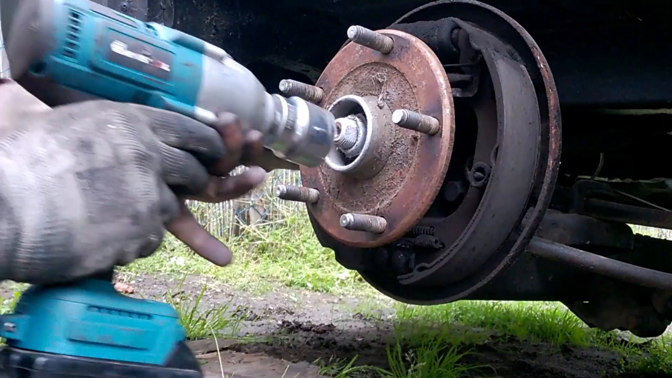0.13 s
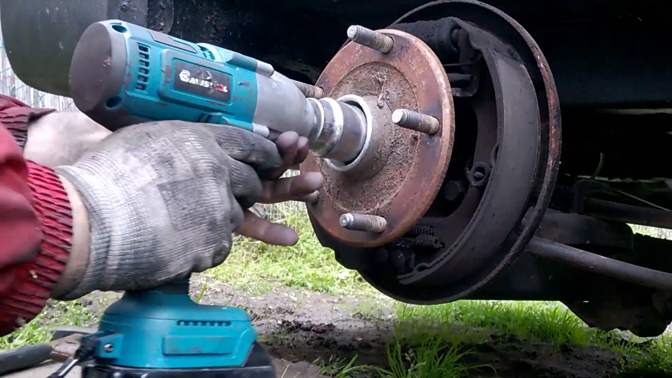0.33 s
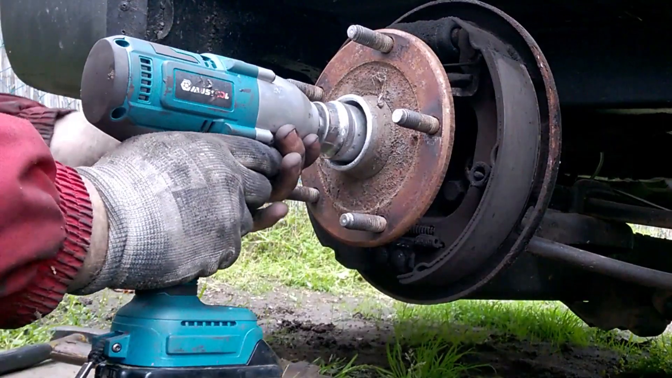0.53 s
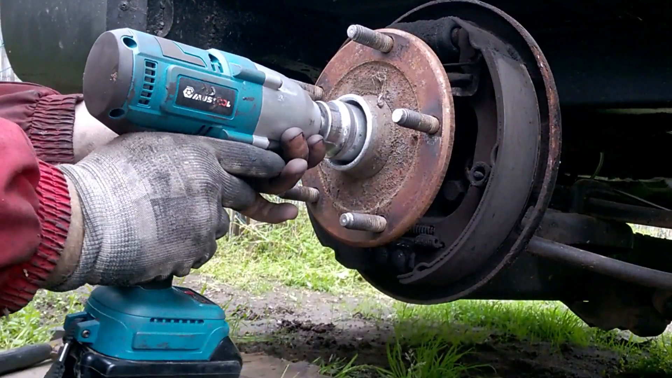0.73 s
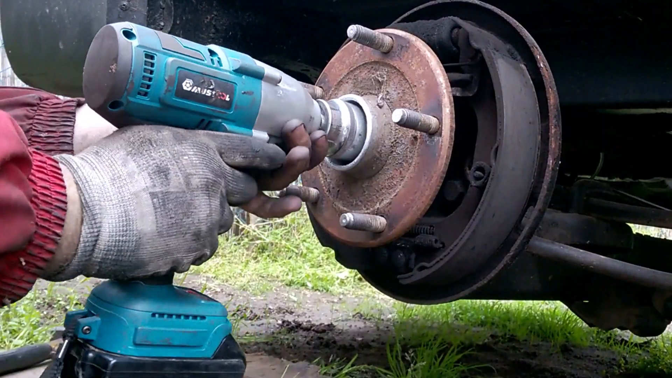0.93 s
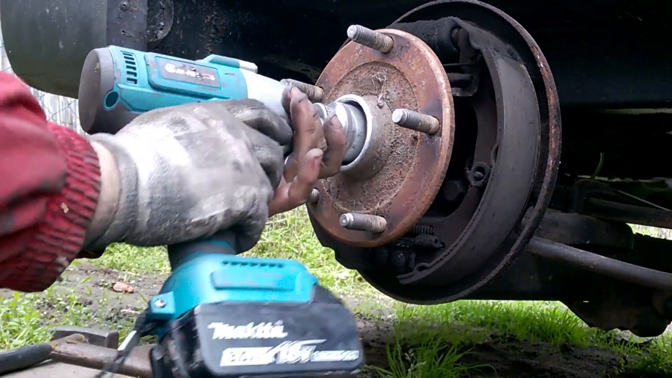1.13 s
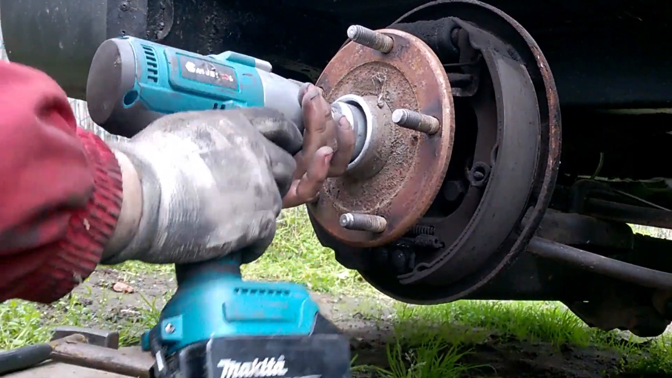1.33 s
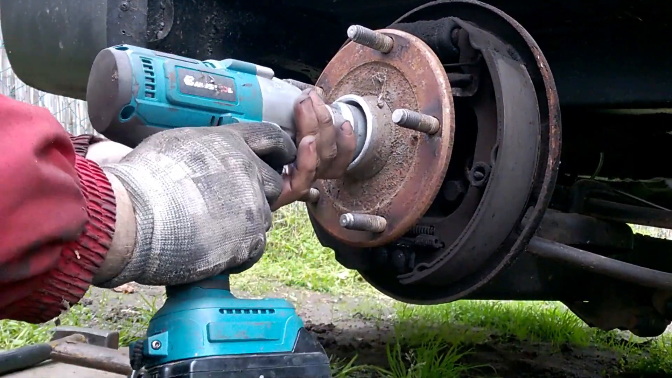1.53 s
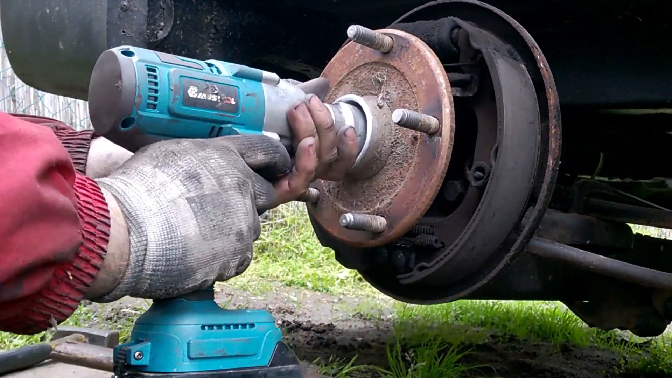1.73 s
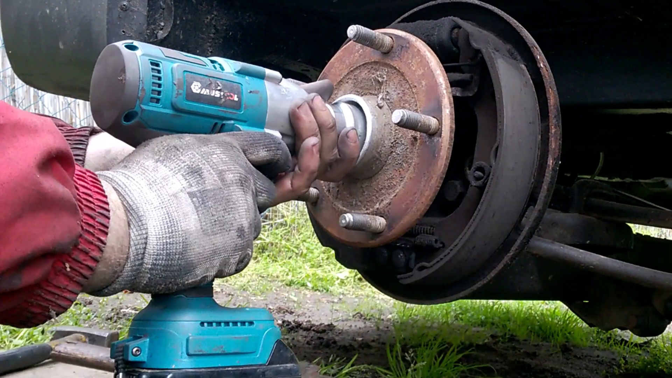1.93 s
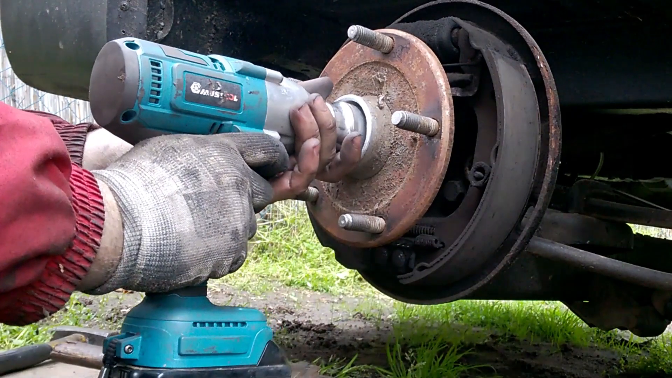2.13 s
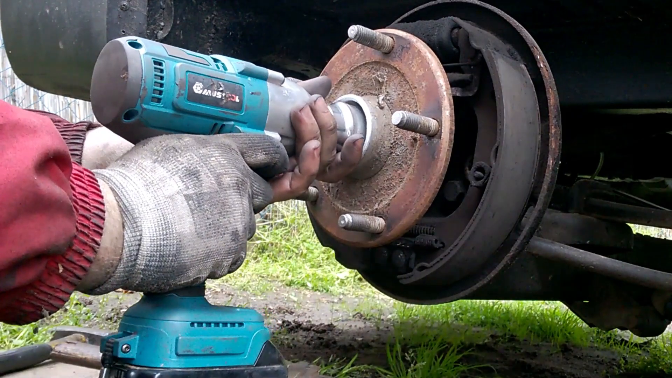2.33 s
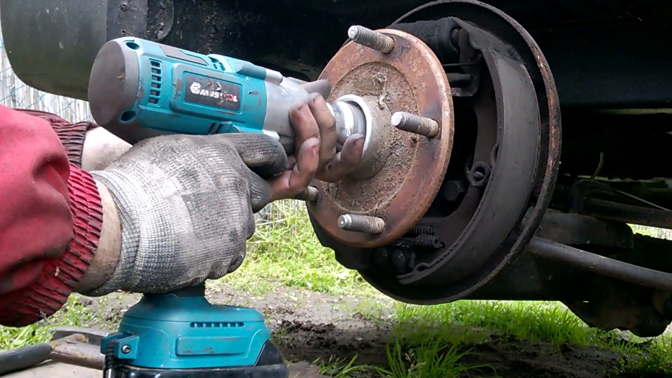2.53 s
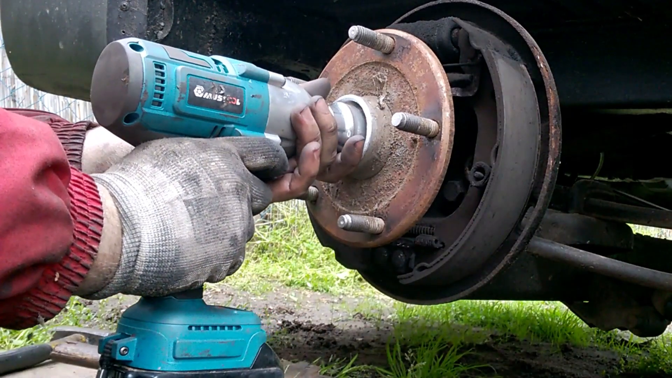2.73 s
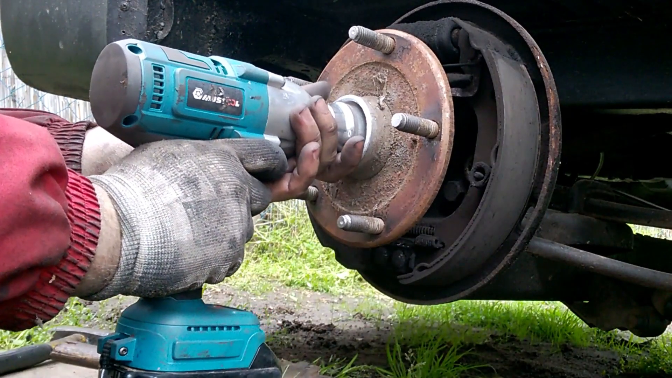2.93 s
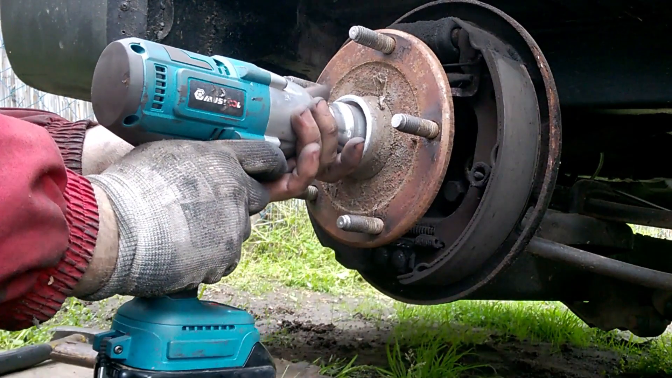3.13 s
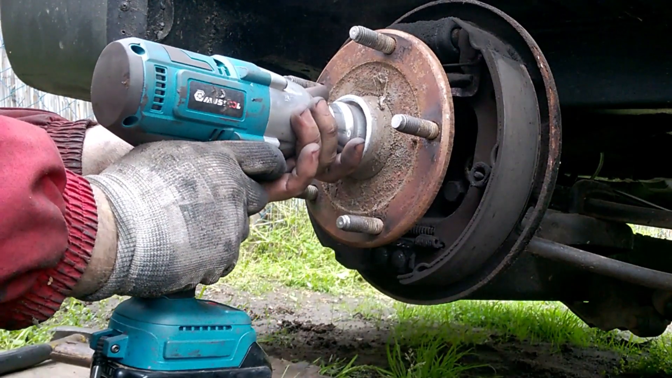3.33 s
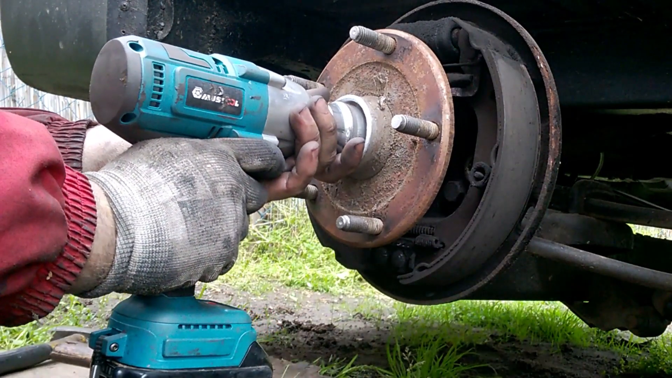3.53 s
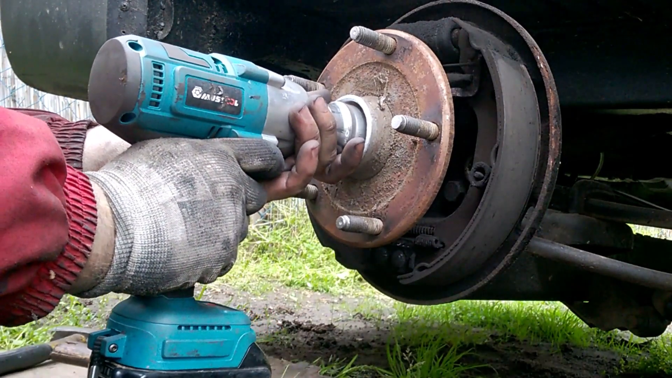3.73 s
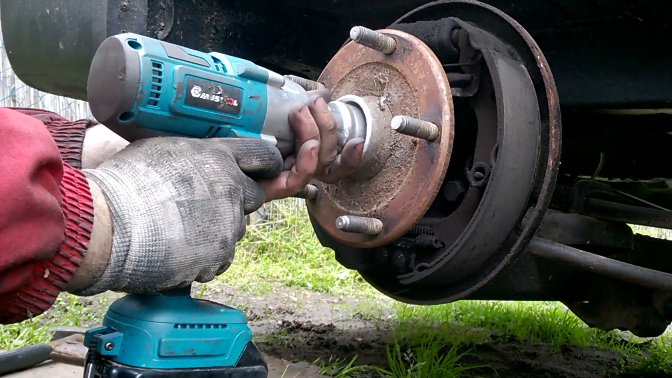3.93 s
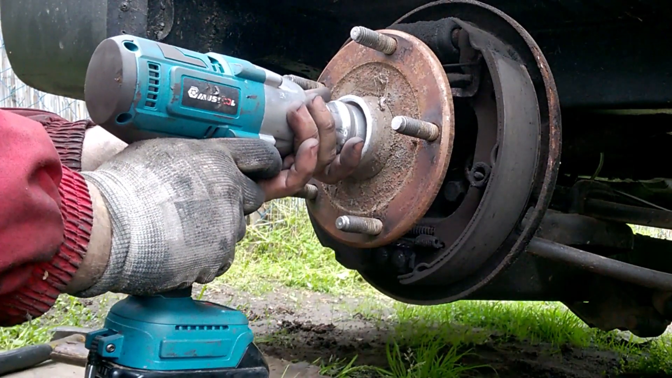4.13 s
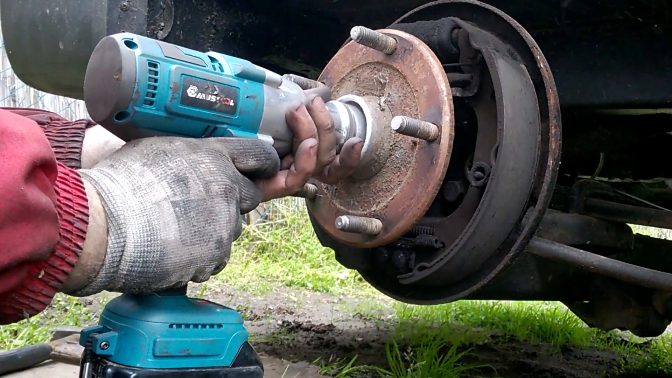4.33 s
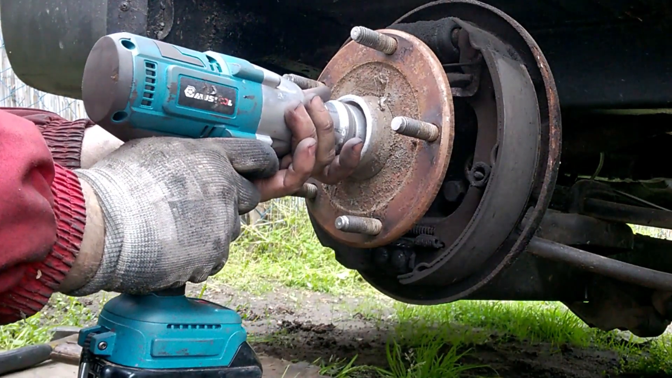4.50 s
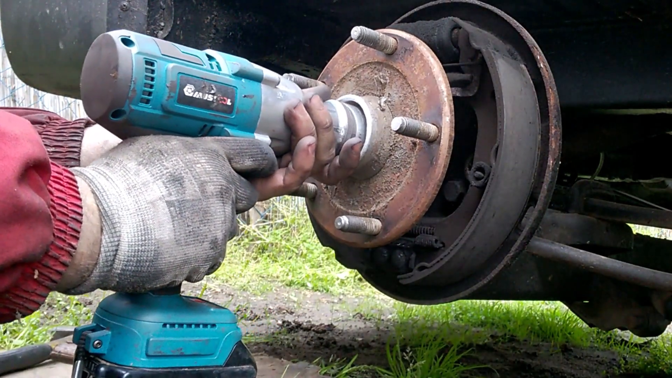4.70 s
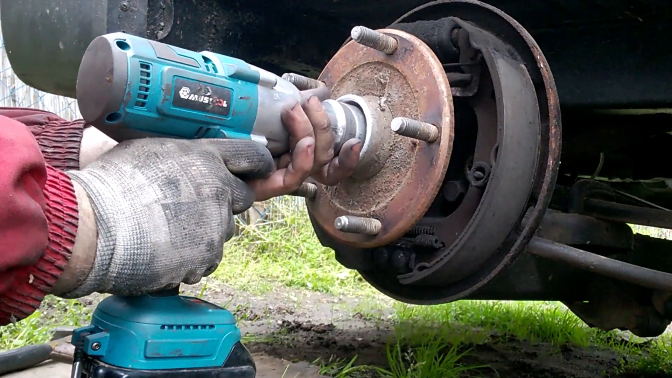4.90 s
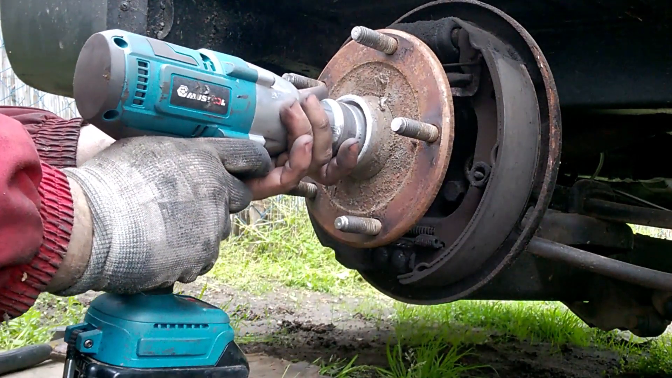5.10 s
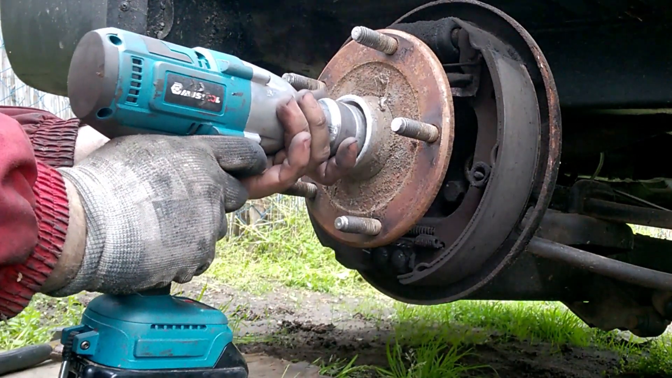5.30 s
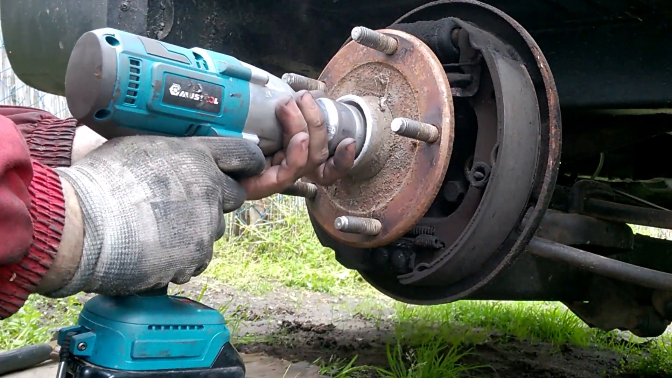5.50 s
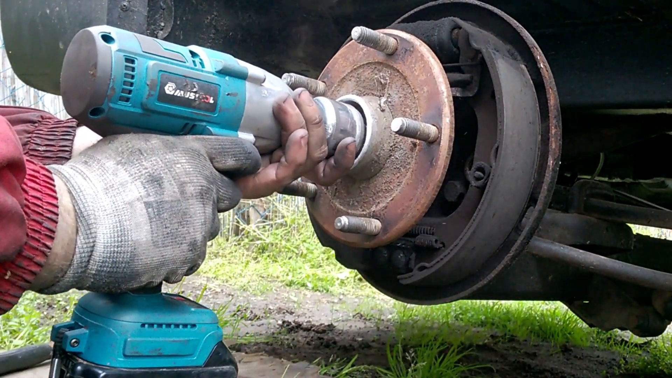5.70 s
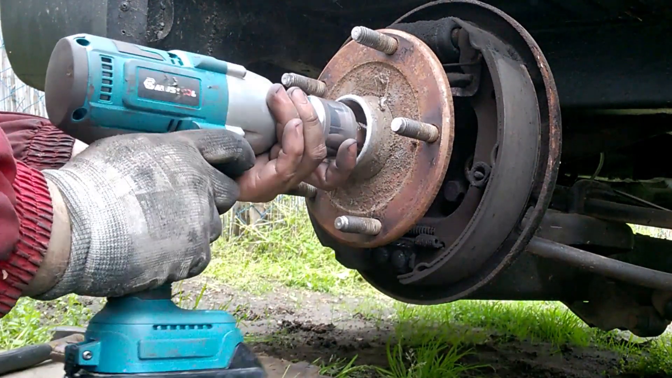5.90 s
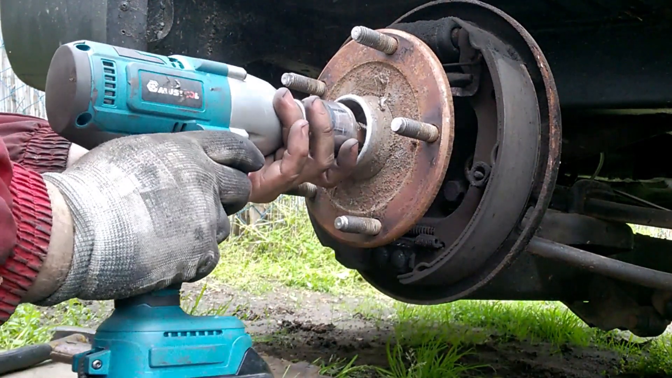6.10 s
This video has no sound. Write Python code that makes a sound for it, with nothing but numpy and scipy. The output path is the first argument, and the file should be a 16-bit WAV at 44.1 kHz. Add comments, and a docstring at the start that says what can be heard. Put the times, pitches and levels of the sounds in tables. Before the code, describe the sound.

Some metal knocks, then about four seconds of fast, steady impact wrench hammering on a nut, ending in a short motor whine.

```python
"""A cordless impact wrench hammers on the hub nut of a car axle, outdoors: about 45 blows a second,
slower and less evenly towards the end, each a volley of decaying noise bands and short sine clacks.
Before and after come knocks of the steel socket and fainter clicks: noise bands, resonances, ringing modes.
Gears rattle as filtered noise while the motor runs, and whine as a gliding harmonic tone once they run free.
A low rumble that swells after jolts and a faint hiss, both coloured noise, lie underneath."""
import sys
import numpy as np
from scipy import signal
from scipy.fft import rfft, irfft, next_fast_len
from scipy.io import wavfile
from scipy.ndimage import uniform_filter1d

SR = 44100
rng = np.random.default_rng(int(sys.argv[2]) if len(sys.argv) > 2 else 0)


def unload_audio(sound):
    """Save the sound as a 16-bit wav file, at the path given as the first command line argument."""
    columns = np.transpose(np.atleast_2d(sound))
    # keep every value between -1 and 1, then stretch to whole-number steps
    steps = np.round(np.clip(columns, -1, 1) * 32767)
    wavfile.write(sys.argv[1], SR, steps.astype(np.int16))


N = 275801
T = np.arange(N) / SR

# speed of the hammer, which sags towards the end: time_s, rate_blows_per_s
HAMMER_RATE = [(1.549, 33.7), (1.6, 46.2), (1.67, 48.7), (1.81, 44.7), (2.27, 44.1), (2.96, 46.5),
               (3.24, 45.2), (4.2, 44.35), (4.28, 44.8), (4.88, 41.25), (4.94, 39.45), (5.4, 37.3),
               (5.59, 39.7), (5.77, 31.6)]


def from_db(db):
    """Level to amplitude: 20 dB is a factor of ten."""
    return 10 ** (np.asarray(db) / 20)


def rms_one(x):
    """Normalise the mean power to one."""
    return x / np.sqrt(np.mean(x ** 2) + 1e-20)


def in_time(rows, t=T):
    """Linear interpolation of each column of a time curve."""
    time_s, *columns = np.transpose(rows)
    return [np.interp(t, time_s, column) for column in columns]


def at_hz(points, hz):
    """Interpolation of a spectrum on a logarithmic frequency axis."""
    point_hz, value = np.transpose(points)
    return np.interp(np.log(np.maximum(hz, 1)), np.log(point_hz), value)


def noise(spectrum):
    """Stationary noise: white noise weighted by a spectral density in dB, at rms 1."""
    size = next_fast_len(N)
    hz = np.arange(size // 2 + 1) * SR / size
    white = rfft(rng.standard_normal(size))
    return rms_one(irfft(white * from_db(at_hz(spectrum, hz)), size)[:N])


def wander():
    """Narrow-band random motion below about 10 Hz, rms 1."""
    return noise([(1, -6), (2, 0), (7, 0), (20, -30), (100, -120)])


def clicks(times, sizes):
    """Idealised impacts: one impulse of one sample per contact."""
    out = np.zeros(N)
    at = np.clip(np.round(np.asarray(times) * SR).astype(int), 0, N - 1)
    np.add.at(out, at, sizes)
    return out


def ring(x, hz, t60):
    """Damped oscillator: a unit impulse excites a sine of initial height 1 that falls 60 dB in t60 s."""
    radius, angle = from_db(-60 / (t60 * SR)), 2 * np.pi * hz / SR
    feedback = [1, -2 * radius * np.cos(angle), radius * radius]
    return signal.lfilter([0, np.sin(angle)], feedback, x + 1e-18)


def clack(times, level_db, hz, t60):
    """Transient of a steel contact: a decaying sine, near peak 1 at 0 dB, low-passed."""
    age, out = np.arange(2048) / SR, np.zeros(N + 2048)
    for start_s, db, pitch_hz in zip(times, level_db, hz):
        at = int(np.clip(start_s * SR, 0, N))
        out[at:at + len(age)] += from_db(db - 60 * age / t60) * np.sin(2 * np.pi * pitch_hz * age)
    return signal.sosfilt(signal.butter(4, 6500, fs=SR, output="sos"), out[:N] + 1e-18)


def clatter(times, level_db, spectrum, decay, body_db=0, treble_db=0, patchy_db=1.5):
    """Statistical energy in crowded modes: each contact feeds noise bands whose energy decays exponentially."""
    # the bass builds up after the contact: frequency_hz, delay_s
    bass_lag = [(100, .016), (250, .013), (500, .006), (900, 0.001), (1500, 0.0003)]
    edges = np.geomspace(80, 17000, 29)  # Hz
    centres = np.sqrt(edges[1:] * edges[:-1])
    widths = np.diff(edges)
    share = from_db(at_hz(spectrum, centres)) ** 2 * widths
    share = share / share.sum()
    white, out = rng.standard_normal((2, N)), np.zeros(N)
    luck = rng.standard_normal((len(times), len(centres)))
    for k, hz in enumerate(centres):
        body_part = at_hz([(430, 0.98), (820, 0.1)], hz)
        treble_part = at_hz([(3000, 0), (7000, 0.71)], hz)
        dose_db = level_db + body_part * body_db + treble_part * treble_db + patchy_db * luck[:, k]
        energy = clicks(times + at_hz(bass_lag, hz), from_db(dose_db) ** 2)
        keep = from_db(-60 / (at_hz(decay, hz) * SR)) ** 2  # energy kept from sample to sample
        stored = signal.lfilter([1], [1, -keep], energy + 1e-18)
        band = signal.butter(2, edges[k:k + 2], "band", fs=SR, output="sos")
        # SR / 2 undoes the power that the band-pass takes from white noise
        out += signal.sosfilt(band, white[k % 2] * np.sqrt(stored * share[k] / widths[k] * SR / 2))
    return out


def hub(x):
    """Resonance: socket, hub and brake plate lift or hollow the sound around their own frequencies."""
    # humps and hollows, broad and narrow, in the sound of the steel: frequency_hz, width_hz, gain_db
    humps = [(309, 65, -7.5), (710, 25, -9), (1180, 300, 0.2), (1617, 32, -4), (2680, 440, 0.3),
             (3300, 120, -3.5), (4510, 290, -7), (5610, 520, 3.5), (6440, 280, -4)]
    # resonances of socket, hub and brake plate: frequency_hz, width_hz, gain_db
    resonances = [(376, 25, 4), (517, 20, 3), (952, 28, 4.5), (1015, 32, 6), (1160, 60, 3.5), (1233, 45, 4),
                  (1533, 40, 2.5), (1954, 38, 4.5), (2210, 42, 5.5), (2440, 50, 2.5), (2566, 24, 5),
                  (2705, 50, 3), (2880, 60, 2.5), (3019, 42, 3.5), (3410, 40, 4.5), (3663, 50, 3.5),
                  (3810, 45, 2.5), (4322, 60, 5.5), (4758, 50, 5), (5115, 45, 3), (5460, 50, 4.5),
                  (5754, 32, 6.5), (6100, 45, 3), (6690, 55, 8), (7235, 35, 7)]
    for hz, width_hz, gain_db in humps + resonances:
        b, a = signal.iirpeak(hz, hz / width_hz, fs=SR)
        x = x + (from_db(gain_db) - 1) * signal.lfilter(b, a, x + 1e-18)
    return x


def background():
    """Incoherent addition: powers of a slowly swelling and sinking rumble and of jolts sum; faint hiss joins."""
    # colour of the rumble: frequency_hz, density_db_per_hz
    rumble_colour = [(18, -15), (24, -1.5), (29, 3.5), (37, -9.5), (55, -4.5), (66, -9.5), (80, -18),
                     (130, -22), (220, -34.5), (400, -49.5), (900, -81.5), (4000, -130)]
    # slowly swelling and sinking rumble, before the common gain: time_s, level_db
    rumble_floor = [(0, -50.5), (1.5, -43.5), (3.4, -40.5), (4.1, -45.5), (4.9, -46), (5.8, -37),
                    (6.1, -47)]
    # jolts that set off a low rumble, before the common gain: start_s, level_db
    jolts = [(.223, -34.5), (.333, -28.5), (.4, -20.5), (1.089, -29), (1.68, -35)]
    # colour of the outdoor hiss: frequency_hz, density_db_per_hz
    air_colour = [(100, -5.5), (190, 2), (300, -10), (550, -12), (1100, -10.5), (3000, -18.5), (5700, -21),
                  (8200, -43.5), (16000, -49)]
    rumble_gain_db, wander_db = 4.5, 2.0
    attack_s, jolt_t60_s = 0.037, 1.0
    air_start_db, air_fade_db_per_s = -56, 1.6

    rumble = noise(rumble_colour)
    rumble = rumble / np.sqrt(uniform_filter1d(rumble ** 2, size=4000) + 1e-9)  # even out its level
    power = from_db(in_time(rumble_floor)[0] + wander_db * wander()) ** 2
    for start_s, db in jolts:
        dying_db = -60 * np.maximum(T - start_s - attack_s, 0) / jolt_t60_s
        attack = np.clip((T - start_s) / attack_s, 0, 1)
        power = power + (attack * from_db(db + dying_db)) ** 2
    hiss = from_db(air_start_db - air_fade_db_per_s * T) * noise(air_colour)
    return from_db(rumble_gain_db) * np.sqrt(power) * rumble + hiss


def motor():
    """Gear mesh: a harmonic tone follows the mesh frequency of the unloaded gears, over a broadband rattle."""
    # overtones of the whine, relative: multiple, level_db
    whine_orders = [(1, -8.5), (2, 1), (3, -5.5), (4, -11), (5, -31), (6.3, -23), (7, -29)]
    # colour of the gear rattle: frequency_hz, density_db_per_hz
    gear_colour = [(88, -36.5), (150, -16.5), (905, -13.5), (1600, -15), (2400, -13), (3220, -8),
                   (3700, -13.5), (4860, -14), (7180, -28), (10600, -38), (16000, -46.5)]
    # colour of the random modulations: frequency_hz, density_db_per_hz
    slow = [(10, 0), (220, 0), (600, -30), (2000, -90)]
    # the trigger is pulled, the hammer stops catching, the trigger is let go
    trigger_s, free_s, release_s = 1.493, 5.785, 5.96
    spin_up_db_per_s, brake_db_per_s, unload_s = 1801, 450, 0.035
    loaded_db, free_db = -26.5, -31  # mean rattle
    # the free mesh frequency rises and falls in one arch; the whine is loudest at the top
    top_s, top_hz, sag_hz_per_s, top_round_s = 5.882, 1657, 4300, 0.012
    whine_db, whine_db_per_hz = -26, 0.03
    waver, flutter_db, rattle_flutter_db = 0.0256, 2.5, 3.0  # rms: share of pitch, levels

    before_s, after_s = np.maximum(trigger_s - T, 0), np.maximum(T - release_s, 0)
    running_db = -spin_up_db_per_s * before_s - brake_db_per_s * after_s
    free = np.clip((T - free_s) / unload_s, 0, 1)
    sag_hz = sag_hz_per_s * (np.hypot(T - top_s, top_round_s) - top_round_s)
    sag_hz = np.minimum(sag_hz, top_hz)
    mesh_hz = (top_hz - sag_hz) * (1 + waver * noise(slow))
    phase = 2 * np.pi * np.cumsum(mesh_hz) / SR
    whine = np.zeros(N)
    for multiple, db in whine_orders:
        whine += from_db(db + flutter_db * noise(slow)) * np.sin(multiple * phase)
    whine = free * from_db(whine_db - whine_db_per_hz * sag_hz) * whine
    rattle_db = loaded_db * (1 - free) + free_db * free + rattle_flutter_db * noise(slow)
    rattle = from_db(rattle_db) * noise(gear_colour)
    return from_db(running_db) * (whine + rattle)


def axle(times, level_db):
    """Modal excitation: every knock rings the same damped modes in varying strengths, the low ones late."""
    # modes of the axle, relative to its drive: frequency_hz, level_db, t60_s
    axle_modes = [(330, -20.5, 0.11), (400, -21.5, .1), (527, -23, .28), (559, -28, .3), (747, -22, .09),
                  (2405, -14, .03), (2970, -34.5, 0.28), (5448, -34, .24)]
    low_lag_s, spread_db = 0.01097, 1.5
    out = np.zeros(N)
    for hz, db, t60_s in axle_modes:
        mode_db = level_db + db + spread_db * rng.standard_normal(len(times))
        out += ring(clicks(times + low_lag_s * (hz < 1000), from_db(mode_db)), hz, t60_s)
    return out


def knocks():
    """Impact of steel on steel: a short clack and clatter, then a fainter ringing of the whole axle."""
    # knocks of the socket, the jolt as the gears stop, and faint last clicks, before the trims:
    # start_s, level_db, body_db, treble_db, clack_hz
    knock_events = [(0.223, -15.5, -13, -12, 1440), (0.334, -19, -20, -25, 1230), (.39, -19, -6, -9, 1250),
                    (0.4, -6, -13, -12, 1180), (0.686, -18, -39, 0, 2730), (1.067, -17, -15, -36, 1243),
                    (1.09, -6.5, -9, -19, 1180), (1.356, -36, -2.5, -25, 1120),
                    (1.383, -37.5, -10, -9, 3680), (1.492, -15.5, -33, -6, 1280),
                    (1.534, -3, -41, -7.5, 3150), (5.795, -11, -10.5, -15.5, 1150),
                    (5.952, -29.5, -6.5, -14.5, 2540), (6.012, -45, -9, -1, 6000),
                    (6.106, -57, -10, -1, 5300), (6.147, -52.5, -12, 4, 5200)]
    # colour of a knock: frequency_hz, density_db_per_hz
    knock_colour = [(100, -14.5), (220, 0.5), (500, -1), (750, -1.5), (1200, 5.5), (1900, -1), (2800, 3.5),
                    (4200, 3), (5600, 10.5), (7500, -42), (11000, -30), (16000, -58)]
    # decay of a knock: frequency_hz, t60_s
    knock_decay = [(150, 0.18), (500, 0.33), (1000, 0.067), (5000, 0.036), (15000, 0.029)]
    # decay of its ringing tail: frequency_hz, t60_s
    tail_decay = [(150, 0.37), (600, 0.2), (2000, 0.2), (5500, 0.17), (9000, .08), (15000, .05)]
    # single notes that particular knocks set ringing: start_s, pitch_hz, level_db, t60_s
    pings = [(0.222, 8899, -47, 0.14), (.34, 234, -28, .2), (.402, 5460, -41, 0.26),
             (.686, 5930, -24.5, 0.019), (1.09, 5130, -14, 0.026), (1.101, 403, -18.5, .1),
             (1.113, 3170, -16.5, 0.046), (1.115, 3270, -33, .15), (5.78, 2568, -47, 0.8)]
    # trims added to the table
    steel_db, tail_db, clack_db, axle_db = -8.5, -19.0, -3.5, 4.0
    body_lift_db, treble_lift_db = 15.5, -1.5
    axle_follows = 0.47  # dB of axle per dB of body

    times, level_db, body_db, treble_db, clack_hz = np.transpose(knock_events)
    tilt = body_db + body_lift_db, treble_db + treble_lift_db
    steel = clatter(times, level_db + steel_db, knock_colour, knock_decay, *tilt)
    steel = steel + clack(times, level_db + clack_db, clack_hz, t60=0.015)
    tail = clatter(times, level_db + tail_db, knock_colour, tail_decay, *tilt)
    knocked = hub(steel + tail) + axle(times, level_db + axle_db + axle_follows * body_db)
    for start_s, hz, db, t60_s in pings:
        knocked += ring(clicks([start_s], from_db(db)), hz, t60_s)
    # a gentle low-pass takes the top treble off the knocks
    return signal.sosfilt(signal.butter(2, 10500, fs=SR, output="sos"), knocked)


def blow_times():
    """Phase accumulation: a blow falls wherever the integrated blow rate passes a whole number."""
    first_s, last_s = 1.549, 5.765
    running = (T >= first_s) & (T < last_s)
    blows = np.cumsum(in_time(HAMMER_RATE)[0][running]) / SR
    return np.interp(np.arange(int(blows[-1]) + 1), blows, T[running])


def hammering():
    """Repeated impact: each blow clacks on the anvil, then the loose socket bounces, weaker and duller."""
    # strength and brightness of the blows, before trims and spreads: time_s, level_db, treble_db
    drive = [(1.55, -14, 6.5), (1.78, -12.5, -1), (2.4, -12, 0.5), (3.0, -13, 2), (3.25, -12, -2),
             (3.55, -11.5, 0), (3.85, -11.5, -3), (4.1, -13.3, 1), (4.9, -11.5, 0.5), (5.4, -12.5, 4),
             (5.77, -9.8, -4)]
    # how unevenly the hammer catches: time_s, timing_spread_s
    uneven = [(4.6, 0.0005), (5.1, .0014)]
    # colour of a blow: frequency_hz, density_db_per_hz
    blow_colour = [(90, -17.5), (170, -9.5), (250, -9), (385, -11), (750, -8), (1150, -2.5), (1700, -5.5),
                   (2550, -4), (4400, -6), (5500, -5), (6600, -12.5), (8000, -22.5), (10800, -19),
                   (13000, -28), (16000, -30.5)]
    # decay of a blow: frequency_hz, t60_s
    blow_decay = [(200, 0.11), (600, 0.081), (1150, 0.052), (2500, 0.067), (5000, 0.086), (9000, 0.05),
                  (15000, 0.067)]
    # contacts of one blow, drawn out as the hammer slows: delay_at_full_rate_s, relative_level_db
    volley = [(0, .5), (.0042, -7.5), (.0088, -4), (.0135, -13.5)]
    # dull modes of the tool's housing: frequency_hz, level_db, t60_s
    housing = [(177.5, -33.5, 0.095), (230, -37.5, 0.12), (379.7, -32.5, .09), (475, -41.5, 0.067),
               (650, -31.5, 0.057)]
    full_rate = 44.7  # blows per s
    body_start_db, body_db_per_lost_blow = -1.0, 0.25  # at full rate; per blow a second below it
    seating_db, seating_s = 9, 0.098
    blow_db, strength_spread_db, colour_spread_db = -1.6, 1.0, 1.5
    sway_db, body_sway_db = 0.28, 1.0
    bounce_spread, bounce_spread_db, bounce_dull_db = 0.2, 2.5, -1.0  # log delay, level, treble
    thud_hz, thud_db, thud_t60_s = 1175, 0.0, 0.013
    snap_hz, snap_db, snap_t60_s = 2650, 3.5, 0.0071
    pitch_spread, clack_spread_db = 0.057, 3.0  # log pitch, level
    recoil_s = 0.013

    times = blow_times()
    count = len(times)
    late, hard, bright, thud_hard, thud_sharp, snap_hard, snap_sharp = rng.standard_normal((7, count))
    spread_s, = in_time(uneven, times)
    level_db, treble_db = in_time(drive, times)
    # the first blows thump while the socket seats itself; slower blows keep more weight
    seating = seating_db * np.exp((times[0] - times) / seating_s)
    lost_blows = full_rate - in_time(HAMMER_RATE, times)[0]
    body_db = body_start_db + seating + body_db_per_lost_blow * lost_blows
    # the tool sways in the hand, and bears now more and now less on the nut
    sway = np.interp(times, T, wander())
    body_db = body_db + body_sway_db * sway
    level_db = level_db + sway_db * sway + blow_db + strength_spread_db * hard
    times = times + spread_s * late
    treble_db = treble_db + colour_spread_db * bright

    contacts, stretch = [], full_rate / in_time(HAMMER_RATE, times)[0]
    for k, (delay_s, db) in enumerate(volley):
        # the first contact has no spread of its own
        bounce_late, bounce_hard = rng.standard_normal((2, count)) * (k > 0)
        at = times + delay_s * stretch * np.exp(bounce_spread * bounce_late)
        contact_db = level_db + db + bounce_spread_db * bounce_hard
        contacts.append([at, contact_db, body_db, treble_db + k * bounce_dull_db])
    at, contact_db, *tilt = np.hstack(contacts)
    rattle = clatter(at, contact_db, blow_colour, blow_decay, *tilt, patchy_db=1.47)

    thud_level_db = level_db + thud_db + clack_spread_db * thud_hard
    thud = clack(times, thud_level_db, thud_hz * np.exp(pitch_spread * thud_sharp), thud_t60_s)
    snap_level_db = level_db + snap_db + clack_spread_db * snap_hard
    snap = clack(times, snap_level_db, snap_hz * np.exp(pitch_spread * snap_sharp), snap_t60_s)
    # the hammer springs back and shakes the housing: a low buzz at the blow rate
    recoil = clicks(times + recoil_s, from_db(body_db))
    buzz = sum(from_db(db) * ring(recoil, hz, t60_s) for hz, db, t60_s in housing)
    return hub(rattle + thud - snap) + buzz


def scene():
    """Superposition: all sources add in one channel, heard from close by."""
    return (background() + motor() + knocks() + hammering())[None]


def record(dry):
    """Soft saturation: after a fade-in the loudest peaks are rounded off, then a steep low-pass cuts the top."""
    # start and end of the fade-in: time_s
    fade_in_s = (.025, .045)
    ceiling, cutoff_hz = 0.69, 15900
    dry = dry * np.interp(T, fade_in_s, (0, 1))
    rounded = dry / (1 + (dry / ceiling) ** 6) ** (1 / 6)
    return signal.sosfilt(signal.ellip(12, 0.1, 90, cutoff_hz, fs=SR, output="sos"), rounded)


dry = scene()
out = record(dry)
unload_audio(out)
```